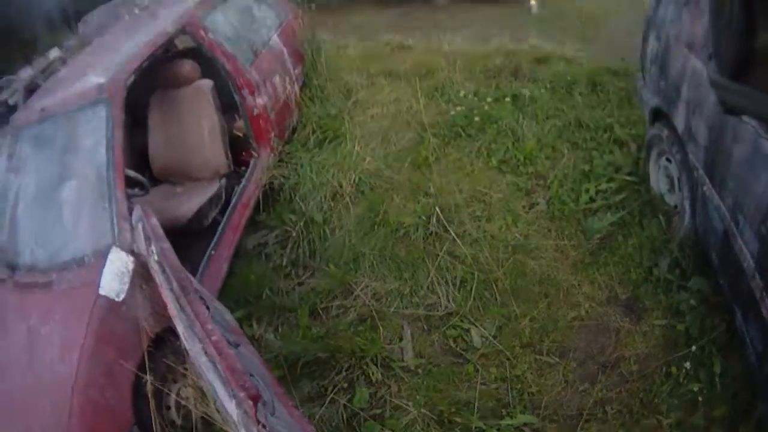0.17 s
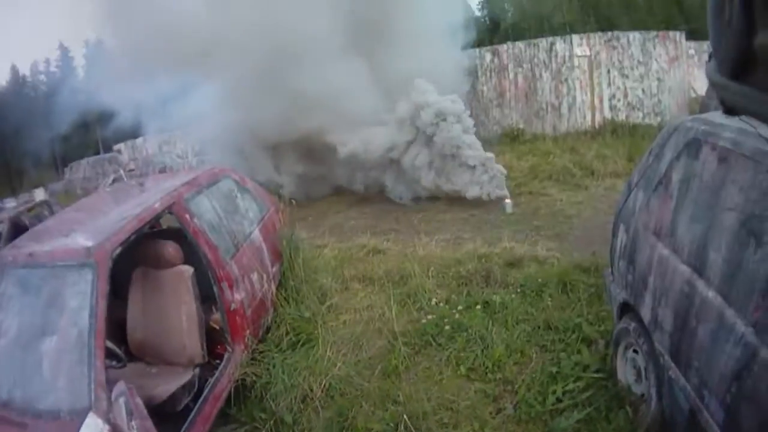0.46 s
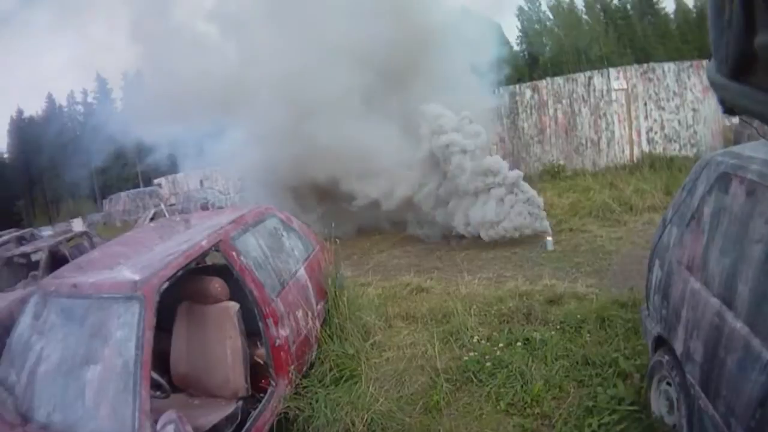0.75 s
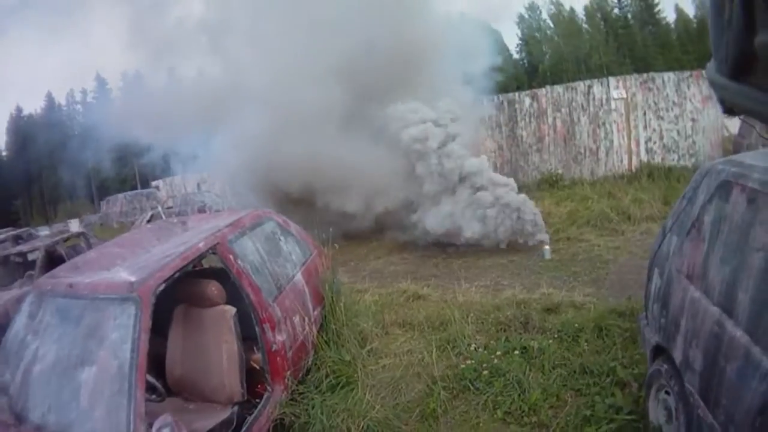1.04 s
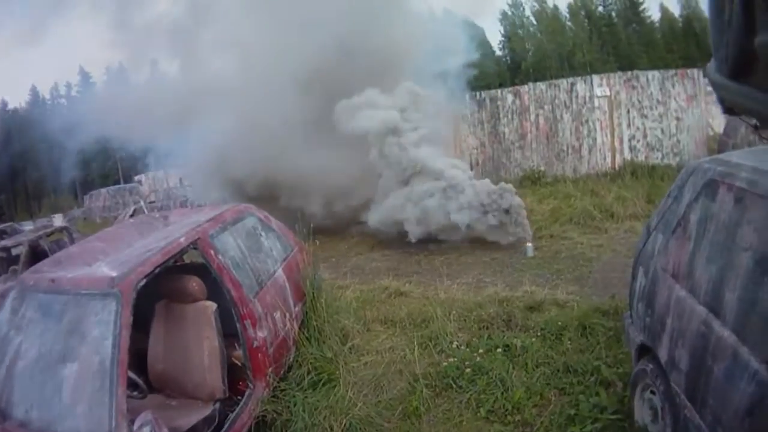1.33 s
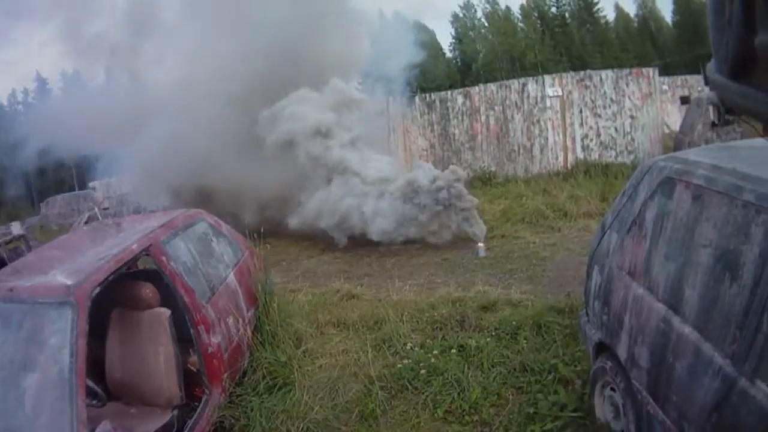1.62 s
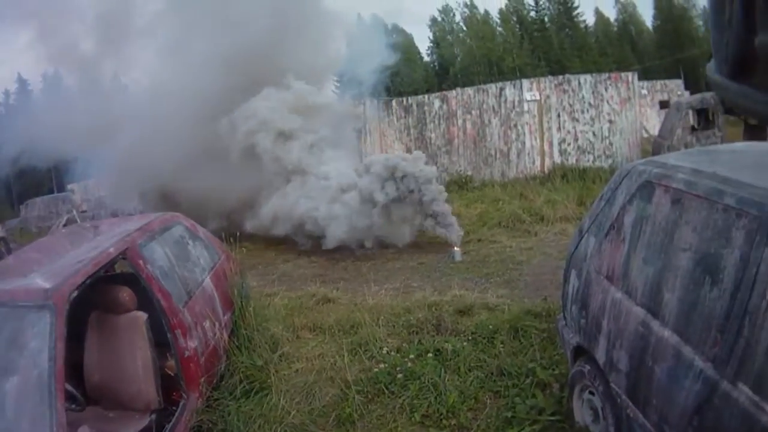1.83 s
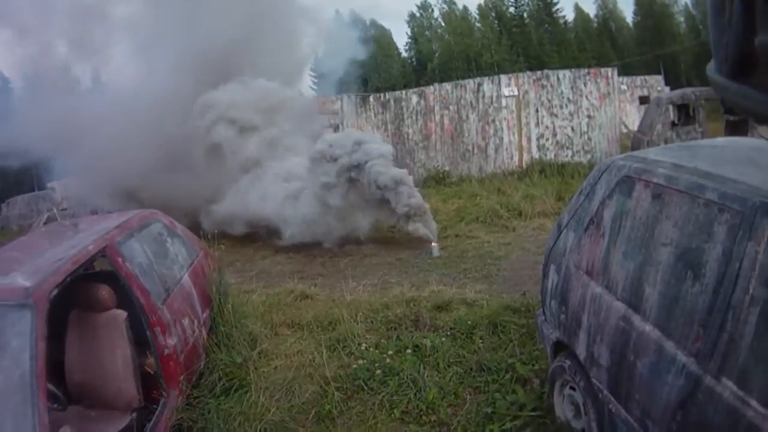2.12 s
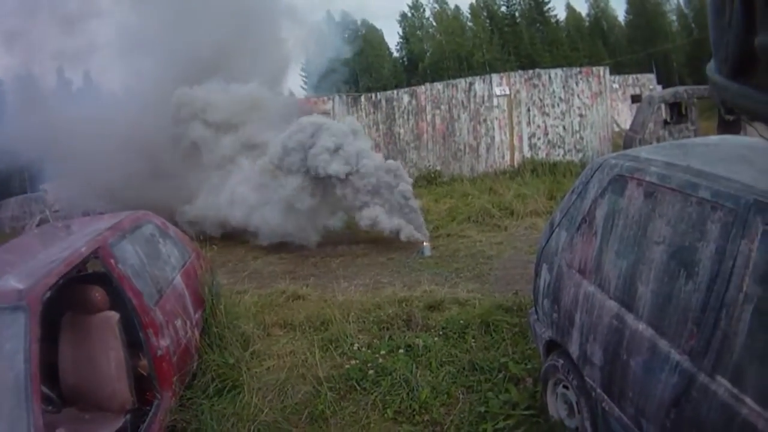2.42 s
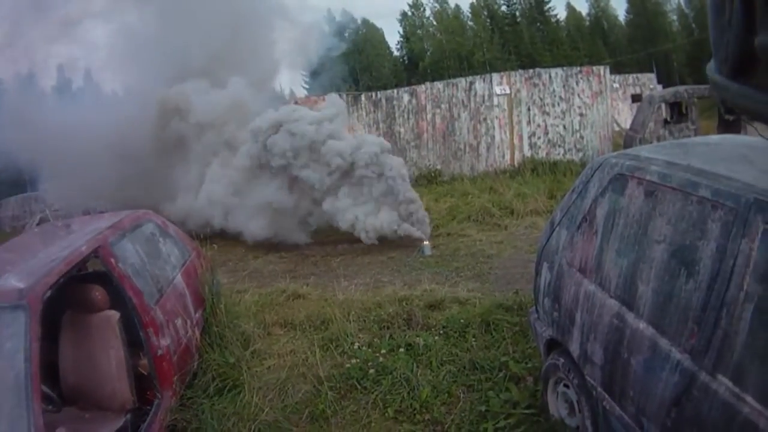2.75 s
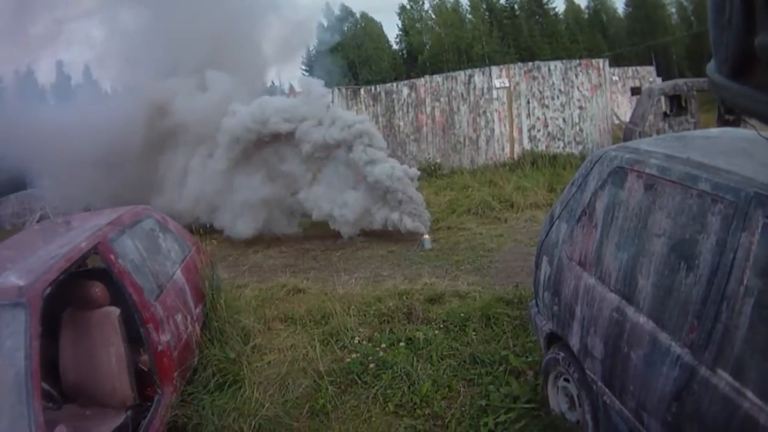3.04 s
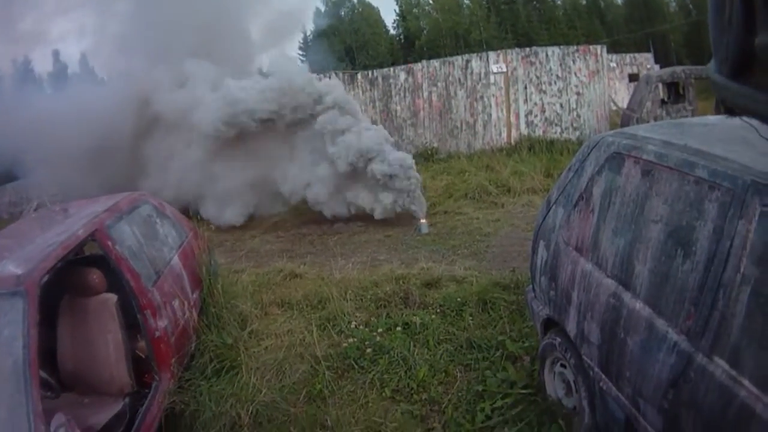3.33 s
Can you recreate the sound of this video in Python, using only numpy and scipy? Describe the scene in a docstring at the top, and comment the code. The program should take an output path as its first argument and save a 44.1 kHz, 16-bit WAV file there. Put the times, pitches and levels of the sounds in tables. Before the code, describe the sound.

Smoke canister hisses loudly and steadily in a grassy field, muffled by a camera housing

```python
"""Smoke canister venting in a field

A steady hiss from the vent, heard by a camera microphone in a closed housing: noise through many
resonances, dips and notches that follow the aim, up from the grass first and a little aside later.
Weak bright echoes come off nearby car bodies. Light wind thuds softly on the housing as low noise,
and a faint treble hiss has opposite sign in the two channels."""
import sys
import numpy as np
from scipy import signal
from scipy.fft import rfft, irfft, next_fast_len
from scipy.io import wavfile
from scipy.ndimage import uniform_filter1d, map_coordinates

SR = 44100
rng = np.random.default_rng(int(sys.argv[2]) if len(sys.argv) > 2 else 0)


def pcm_store(signal):
    """Save signal as 16-bit PCM."""
    levels = np.round(np.clip(np.atleast_2d(signal), -1, 1) * 32767)
    wavfile.write(sys.argv[1], SR, levels.astype(np.int16).T)


N = 153468


def jet():
    """Turbulent noise from the vent, patchy in time and pitch, fluttering in the treble, in the housing."""
    # level of the jet before its flutter: t/s, level/dB
    jet_levels = [(0.0, -43.5), (0.15, -44.5), (0.17, -42.5), (0.39, -43), (0.71, -42), (0.8, -43),
                  (3.33, -40.5), (3.48, -41)]
    frames = dict(nperseg=2048, noverlap=1792)
    hz, t, spectrum = signal.stft(rng.standard_normal(N), SR, **frames)
    patches = uniform_filter1d(rng.standard_normal(spectrum.shape), size=24, axis=0)
    patches = uniform_filter1d(patches, size=10, axis=1)
    heard = spectrum * housing(hz, t) * amp(0.61 * unit(patches))
    hiss = unit(signal.istft(heard, SR, **frames)[1][:N])

    # unsteady flow, felt most in the treble
    flutter_depth_db, treble_hz = 0.6, 10000
    treble = filtered(hiss, lambda f: 1 / (1 + (treble_hz / (f + 1)) ** 8))
    flutter_db = flutter_depth_db * (0.5 * wobble(6.07) + 0.74 * wobble(30) + 0.6 * wobble(70))
    fluttering = hiss - treble + treble * amp(flutter_db)

    level_db, = curves(jet_levels, np.arange(N) / SR)
    return amp(level_db + 0.35 * wobble(12)) * fluttering


def housing(hz, t):
    """Gain by frequency and time: housing resonances whose balance depends on where the camera points."""
    # where the camera points: t/s, looking down/0-1, settling/0-1, turned aside/0-1
    aim = [(0, 1, 0, 0.04), (.2, 0.94, .1, 0.04), (.33, .7, .6, 0.04), (.45, 0.3, 1, 0), (.6, 0.13, 1, 0),
           (.78, 0, 0.8, 0.07), (.9, 0.07, 0, 0), (1.5, 0.15, 0.1, 0), (1.62, 0.12, 0, 0.57),
           (1.95, 0.06, 0.2, 0.65), (2.15, 0.03, 0.16, 0.9), (2.7, 0, 0, 0.97), (3.48, 0.11, 0.04, 0.85)]
    # housing resonances, relative levels: f/Hz, width/Hz, facing/dB, change down/dB, change aside/dB
    resonances = [(188, 67, -16.5, -4, -2.5), (273, 81, -10, 0.5, 1), (458.6, 64, -5, 3, 1),
                  (548, 107, 0.5, -0.5, 0.5), (617, 84, -3.5, 0, 1.5), (794, 61, -7, -2, 3),
                  (1068, 126, -21, 10, 2.5), (1395, 123, -19.5, -1.5, -0.5), (1818, 325, -14, -3.5, -2),
                  (2270, 260, -7, -3.5, 1.5), (2582, 290, -7.5, -8.5, -1.5), (2980, 200, -19, 6, -1),
                  (3333, 404, -7, -3.5, 2.5), (3628, 235, -4.5, -1, 1.5), (4067, 324, -3, 1.5, 2),
                  (4334, 190, -8.5, 4, -5.5), (5070, 590, -18, -4.5, 1), (5810, 530, -18, -5, 4),
                  (6370, 556, -7, -7.5, -1), (7130, 530, -17, 12, 7.5), (7540, 390, -16.5, 1, 7.5),
                  (8200, 380, -16.5, -5, 0), (8650, 340, -17.5, -4, 0.5), (9550, 630, -24, 1.5, -4),
                  (10050, 250, -26.5, 2, 3.5), (10370, 200, -25.5, 0, 0), (10790, 415, -18, -2.5, 2),
                  (11430, 730, -25.5, 6, 1.5), (12550, 600, -25, -4, -6.5), (13350, 500, -31, 2, 2),
                  (14050, 820, -24, -2, -4), (14600, 500, -29, 0, -1), (15100, 500, -30, 0, -5)]
    # narrow losses at every aim: f/Hz, width/Hz, change/dB
    notches = [(358, 44, -1), (699, 32, -8.5), (1044, 55, -1.5), (1174, 63, -6), (1525, 60, -4.5),
               (2040, 90, -2), (2750, 120, -1.5), (4650, 150, -2), (8810, 150, -5), (9800, 150, -3),
               (12100, 200, -4)]
    # colour while still settling: f/Hz, width/Hz, change/dB
    settling_colour = [(3280, 500, -1.5), (6530, 500, -2), (7460, 900, 5), (8300, 400, 0), (9100, 400, 5),
                       (9630, 500, 4), (10300, 400, 1), (11000, 800, -0.5), (4380, 500, -2),
                       (12500, 600, -3), (13500, 600, 3), (14100, 800, 1), (15000, 500, -3)]
    # dips that climb as the camera swings up:
    # middle t/s, half length/s, middle f/Hz, climb/(octaves/s), width/octaves, change/dB
    shadows = [(.31, 0.062, 10500, 3, .16, -4.5), (.41, .09, 14000, 1.5, .13, -5),
               (0.48, .1, 11200, .3, .1, -3), (.33, .14, 5800, 1.5, 0.084, -3.5),
               (0.045, 0.09, 1560, .1, 0.28, -2), (0.091, 0.14, 7600, .1, .05, -5)]
    steep = 1.547  # how fast the flanks of a resonance fall

    down, settling, aside = curves(aim, t)
    centre, width, facing_db, down_db, aside_db = np.transpose(resonances)[:, :, None]
    shape = (1 + (2 * (hz - centre) / width) ** 2) ** -steep
    power = amp(2 * (facing_db + down_db * down + aside_db * aside))
    gain = np.sqrt(shape.T @ power)
    gain = gain * amp(bumps(notches, hz) + bumps(settling_colour, hz) * settling)
    gain = gain * echoes(hz, aside)

    dips_db = 0
    for middle, half, mid_hz, climb, octaves, db in shadows:
        off_pitch = (np.log2((hz[:, None] + 1) / mid_hz) - climb * (t - middle)) / octaves
        off_time = (t - middle) / half
        dips_db = dips_db + db * np.exp(-off_pitch ** 2 - off_time ** 4)
    # equal total gain at every moment, so that the aim alters colour; the dips come on top
    return gain / np.linalg.norm(gain, axis=0) * amp(dips_db)


def echoes(hz, aside):
    """Direct sound plus weak bright copies off car bodies, one of which comes sooner as the camera turns."""
    # reflections off nearby car bodies: delay facing/ms, delay turned aside/ms, level/dB
    reflections = [(2.19, 2.19, -23), (2.85, 2.45, -21), (3.7, 3.7, -30)]
    bright_hz = 2500  # echoes carry mainly above this
    f = hz[:, None]
    copies = 0
    for facing_ms, aside_ms, db in reflections:
        delay_ms = facing_ms + (aside_ms - facing_ms) * aside
        copies = copies + amp(db) * np.exp(-2j * np.pi * f * delay_ms / 1000)
    return 1 + copies / (1 + (bright_hz / (f + 1)) ** 4)


def wind():
    """Low lumpy rumble of wind on the housing: noise shaped to the bass, swelling in thuds."""
    # level of the wind thuds: t/s, level/dB
    wind_levels = [(0.0, -74), (0.04, -85), (0.74, -70.5), (0.75, -61.5), (1.23, -85), (1.3, -65),
                   (1.48, -80), (1.51, -69), (1.54, -82), (1.77, -80), (1.79, -72), (1.83, -81), (2.4, -89),
                   (2.47, -73), (2.68, -84), (2.73, -73), (2.81, -83), (2.84, -74), (3.15, -86), (3.3, -67),
                   (3.35, -85), (3.48, -78)]
    # relative spectrum of the rumble: f/Hz, density/dB
    thud_spectrum = [(12, -30), (25, -7), (50, -4), (110, -2), (170, -7), (300, -46), (1000, -120)]
    f, db = np.transpose(thud_spectrum)
    rumble = filtered(rng.standard_normal(N), lambda hz: amp(np.interp(np.log(hz + 1), np.log(f), db)))
    lumpy = unit(rumble * amp(2.5 * wobble(17)))
    level_db, = curves(wind_levels, np.arange(N) / SR)
    return amp(level_db) * lumpy


def scene():
    """Jet and wind at one microphone, which feeds both channels."""
    return np.tile(jet() + wind(), (2, 1))


def record(dry):
    """A faint treble hiss of opposite sign in the two channels, then the band limit."""
    side_db, side_hz, top_hz = -77, 12200, 15290
    side_hiss = filtered(rng.standard_normal(N), lambda hz: 1 / (1 + (side_hz / (hz + 1)) ** 8))
    side_hiss = amp(side_db) * unit(side_hiss)
    return filtered(dry + np.array([side_hiss, -side_hiss]), lambda hz: hz < top_hz)


def amp(db):
    """Amplitude factor for a level in dB."""
    return 10 ** (np.asarray(db) / 20)


def unit(x):
    """x scaled to an RMS of one."""
    return x / np.sqrt(np.mean(x ** 2) + 1e-20)


def curves(rows, t):
    """Each column after the time, read at times t."""
    times, *columns = np.transpose(rows)
    return [np.interp(t, times, column) for column in columns]


def wobble(rate):
    """A smooth random curve, rate knots a second."""
    knots = rng.standard_normal(int(N * rate / SR) + 4)
    return map_coordinates(knots, [np.arange(N) * rate / SR])


def filtered(x, response):
    """x with its spectrum multiplied by a response of frequency."""
    m = next_fast_len(N + 8192)
    return irfft(rfft(x, m) * response(np.fft.rfftfreq(m, 1 / SR)), m)[..., :N]


def bumps(rows, hz):
    """Summed bell-shaped dB changes over frequency, as one column."""
    return sum(db * np.exp(-(2 * (hz - centre) / width) ** 2) for centre, width, db in rows)[:, None]


dry = scene()
out = record(dry)
pcm_store(out)
```